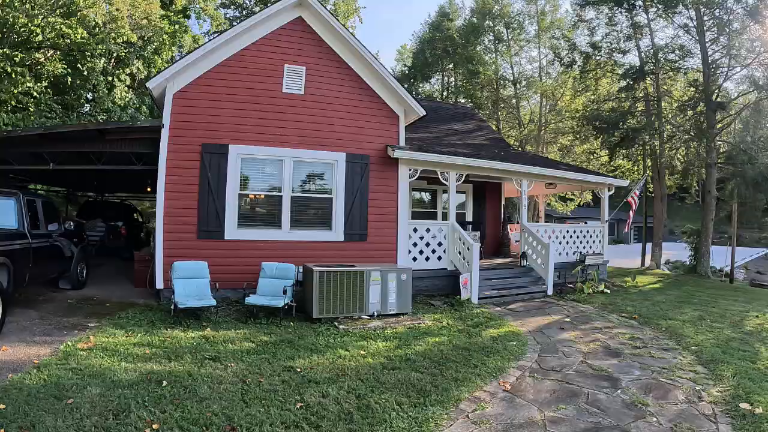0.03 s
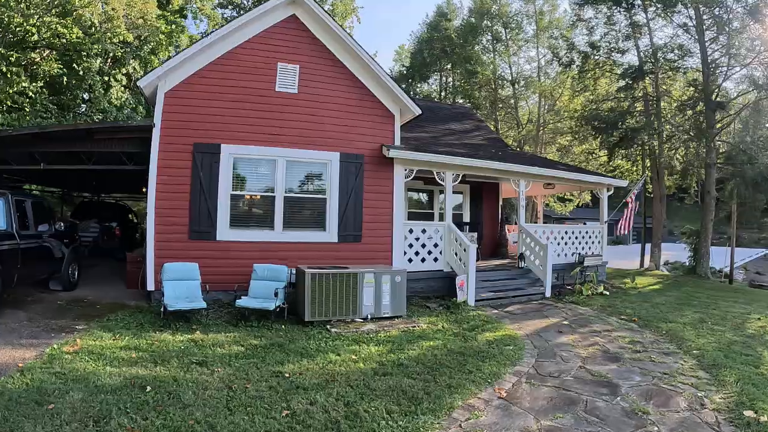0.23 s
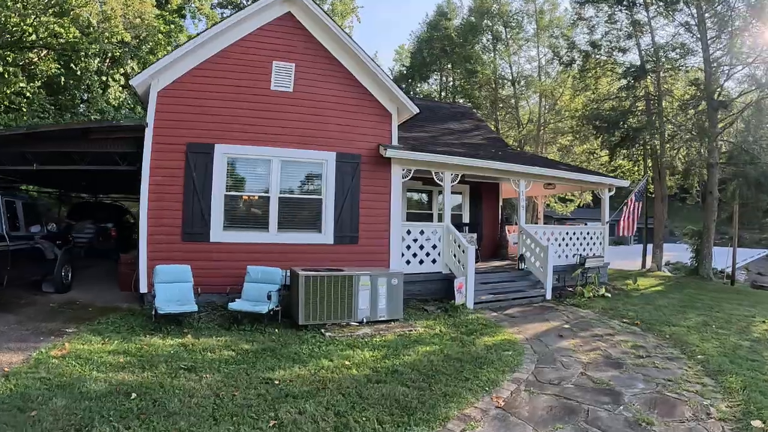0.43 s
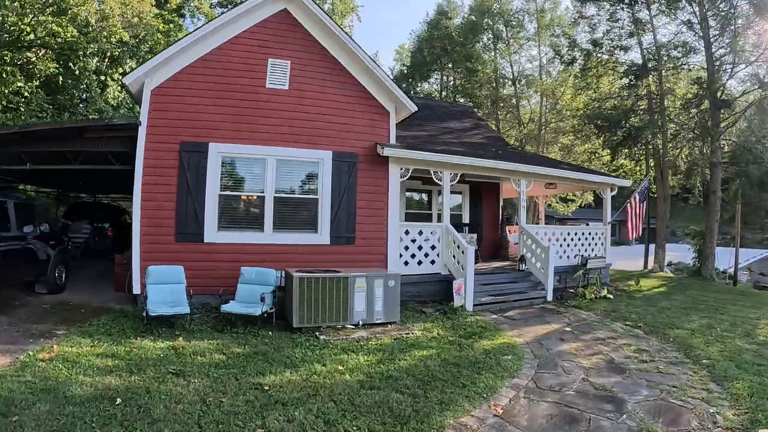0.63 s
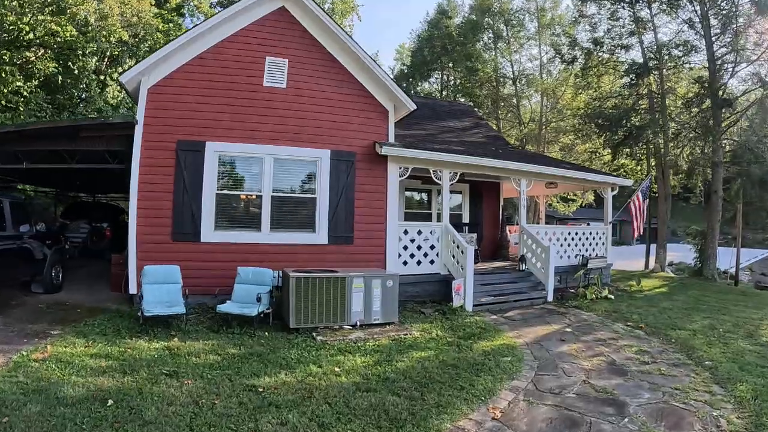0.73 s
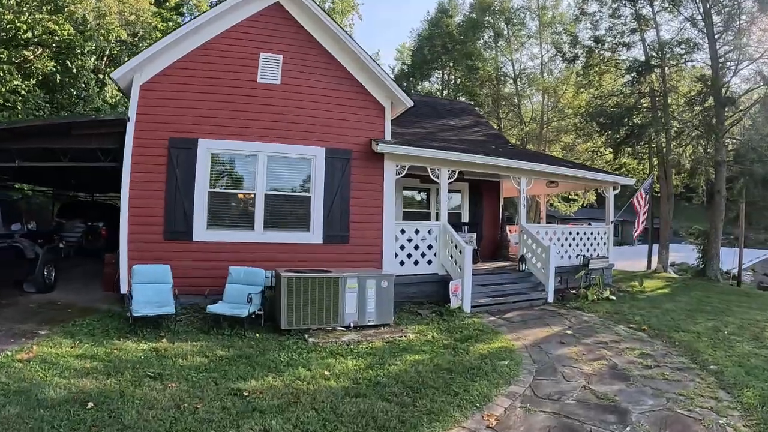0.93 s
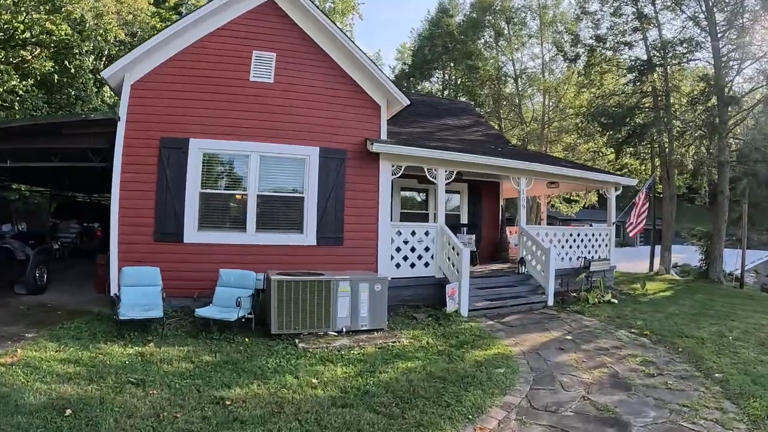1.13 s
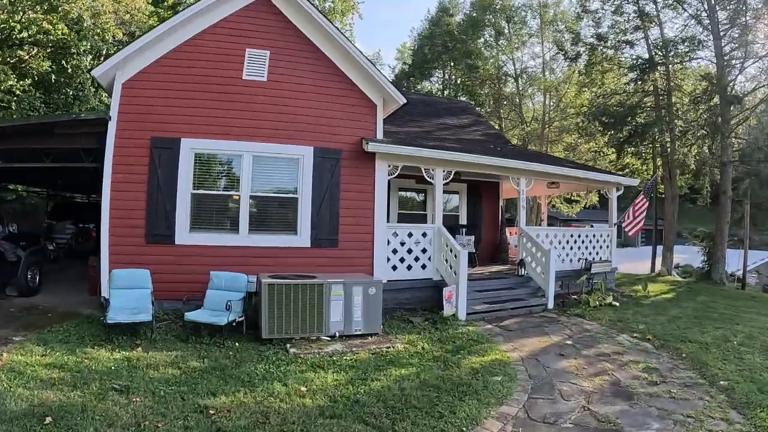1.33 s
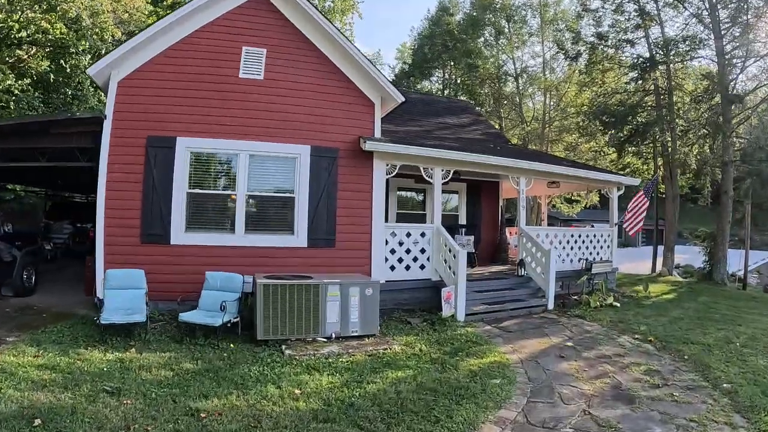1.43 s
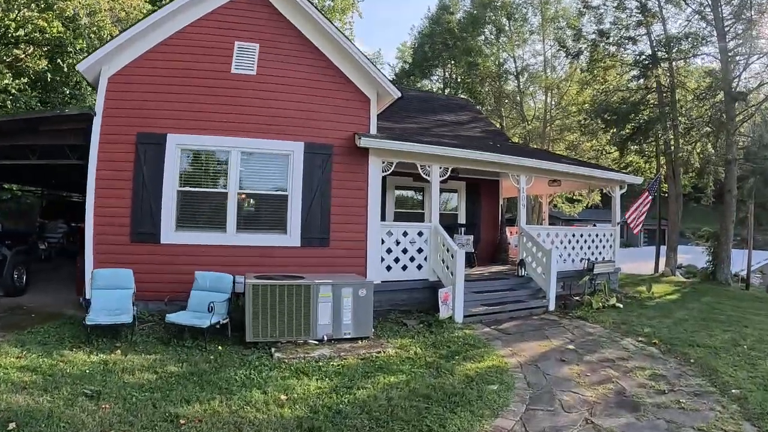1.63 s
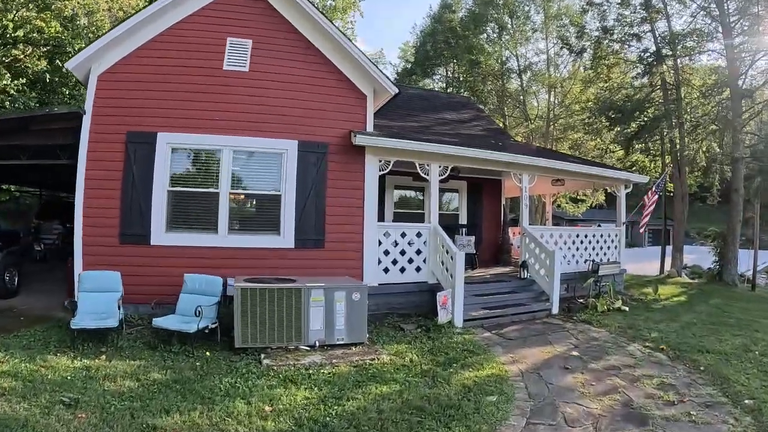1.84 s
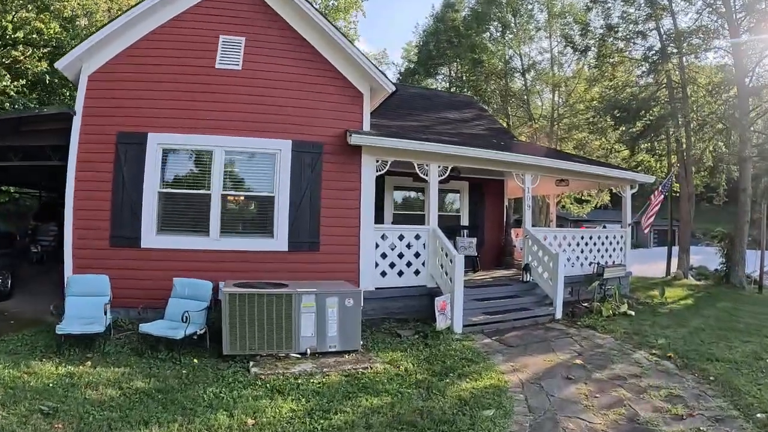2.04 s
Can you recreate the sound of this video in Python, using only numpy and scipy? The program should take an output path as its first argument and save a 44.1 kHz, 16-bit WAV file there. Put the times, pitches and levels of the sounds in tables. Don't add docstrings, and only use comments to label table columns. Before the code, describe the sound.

An outdoor air conditioner beside a house fades in from silence at about 0.1 to 0.3 s, then runs steadily to 2.1 s: low mains hum, cabinet rumble, soft fan rush. A vehicle passes nearby, tyre roar strongest around 0.5 to 0.8 s, low engine drone around 0.7 to 1 s, sagging slightly and fading. Low wind puffs flutter at the microphone, notably 0.8 and 1.5 s; leaves and insects are barely audible.

```python
import sys
import numpy as np
from scipy import signal
from scipy.fft import rfft, irfft, next_fast_len
from scipy.io import wavfile
from scipy.ndimage import uniform_filter1d, map_coordinates

SR = 44100
rng = np.random.default_rng(int(sys.argv[2]) if len(sys.argv) > 2 else 0)


def attenuation_scalar(level_db):
    decades = np.asarray(level_db, float) / 20
    return 10 ** decades


def to_wav(sig):
    pcm = np.clip(np.atleast_2d(sig), -1, 1) * 32767
    pcm = np.round(pcm).astype(np.int16)
    wavfile.write(sys.argv[1], SR, pcm.T)


N = 91551
TIME_S = np.arange(N) / SR


def unit(x):
    return x / np.sqrt(np.mean(x ** 2) + 1e-20)


def curves(rows):
    knot_s, *columns = np.transpose(rows)
    return [np.interp(TIME_S, knot_s, column) for column in columns]


def wobble(rate):
    return map_coordinates(rng.standard_normal(200), [TIME_S * rate])


def coloured(x, spectrum):
    knot_hz, knot_db = np.transpose(spectrum)
    size = next_fast_len(N + 8192)
    hz = np.fft.rfftfreq(size, 1 / SR)
    gain_db = np.interp(np.log(hz + 1), np.log(knot_hz + 1), knot_db, left=-120, right=-120)
    return unit(irfft(rfft(x, size) * attenuation_scalar(gain_db), size)[:N])


def rush(spectrum, patchy_db):
    cells = signal.stft(rng.standard_normal(N), nperseg=512)[2]
    patches = uniform_filter1d(rng.standard_normal(cells.shape), size=6, axis=0)
    patches = unit(uniform_filter1d(patches, size=14, axis=1))
    noise = signal.istft(cells * attenuation_scalar(patchy_db * patches), nperseg=512)[1][:N]
    return coloured(noise, spectrum)


def tone(cycles, rough_db, drift, rate):
    phase = 2 * np.pi * (cycles + rng.random()) + drift * wobble(rate)
    level = np.sqrt(2) * attenuation_scalar(rough_db * wobble(rate))
    return level * np.sin(phase)


# pitch_hz, level_db
COMPRESSOR_HUM = [(60, -44), (120, -39), (180, -57.5), (240, -65), (360, -64)]
# start_s, level_db
FAN_LEVEL = [(0, -32.5), (.5, -31), (1, -35), (1.45, -35), (1.75, -34.5), (2.08, -33.5)]
# pitch_hz, level_db (per Hz)
CABINET_RUMBLE = [(5, -1), (25, -1.5), (60, -1), (105, 2), (170, -2), (250, -9.5), (330, -15), (460, -26)]
# pitch_hz, level_db (per Hz)
GRILLE_AIR = [(250, -14.5), (450, -1.5), (750, 1.5), (1600, -5.5), (2400, -15), (4000, -21.5), (6500, -36),
              (9000, -46.5)]


def conditioner():
    hum = sum(attenuation_scalar(level_db) * tone(pitch_hz * TIME_S, rough_db=2.5, drift=.2, rate=8.2)
              for pitch_hz, level_db in COMPRESSOR_HUM)
    rumble = attenuation_scalar(0.4 * wobble(7)) * rush(CABINET_RUMBLE, patchy_db=0.4)
    air_db = -8
    air = attenuation_scalar(air_db + 0.3 * wobble(7)) * rush(GRILLE_AIR, patchy_db=0.8)
    return hum + attenuation_scalar(curves(FAN_LEVEL)[0]) * (rumble + air)


# start_s, pitch_hz (cylinder firings a second), level_db
ENGINE_PASS = [(.1, 90.6, -38), (.25, 91.0, -36), (.4, 91.4, -30), (.58, 91.4, -31), (.72, 91.2, -27),
               (.98, 91.1, -27), (1.15, 90.6, -29), (1.25, 89.4, -35), (1.34, 88.8, -33), (1.45, 88.2, -39),
               (1.7, 87.5, -40), (1.85, 87.5, -48), (2.08, 88.0, -41)]
# multiple (of the firing pitch), level_db
ENGINE_TONES = [(.5, -19), (1, 0), (1.5, -22), (2, -15), (2.5, -22), (3, -21), (3.5, -25), (4, -27),
                (5, -33)]


def engine():
    upper_follows = .5
    rough_db, drift_rad = 3, .5
    firing_hz, level_db = curves(ENGINE_PASS)
    firings = np.cumsum(firing_hz) / SR
    loudest_db = level_db.max()
    upper_db = loudest_db + upper_follows * (level_db - loudest_db)
    note = np.zeros(N)
    for multiple, tone_db in ENGINE_TONES:
        main = multiple == 1
        swell_db = level_db if main else upper_db
        roughness = rough_db * (.4 if main else 1)
        sound = tone(multiple * firings, roughness, drift_rad * np.sqrt(multiple), rate=9)
        note += attenuation_scalar(tone_db + swell_db) * sound
    return note


# start_s, level_db
TYRE_LEVEL = [(0, -54), (.3, -47), (.5, -42.5), (.63, -46), (.78, -44), (.92, -52.5), (1.2, -50.5),
              (2.08, -55.5)]
# pitch_hz, level_db (per Hz)
TREAD_ROAR = [(110, -15.5), (170, -3.5), (450, -10), (1000, 6.5), (1500, 6), (2100, 0), (2400, -7.5),
              (6000, -27.5)]


def tyres():
    return attenuation_scalar(curves(TYRE_LEVEL)[0] + 0.2 * wobble(8)) * rush(TREAD_ROAR, patchy_db=0.7)


# peak_s, level_db, half_length_s, flutter_hz
WIND_GUSTS = [
    (.4, -39, .05, 18),
    (.55, -39, 0.054, 56),
    (0.808, -31, .05, 55),
    (1.03, -34.5, 0.058, 42),
    (1.313, -37, 0.046, 55),
    (1.53, -30, .06, 28),
    (1.803, -33.5, 0.039, 43),
    (1.845, -36.5, .08, 15),
]


def wind():
    gusts = np.zeros(N)
    for peak_s, level_db, half_s, flutter_hz in WIND_GUSTS:
        swell = np.exp(-((TIME_S - peak_s) / half_s) ** 2)
        gusts += attenuation_scalar(level_db) * swell * tone(flutter_hz * TIME_S, rough_db=2.5, drift=.9, rate=25)
    return gusts


# start_s, level_db
RUSTLE_LEVEL = [(0, -80), (.3, -71), (.9, -67.5), (1.3, -71.5), (2.08, -70)]
# pitch_hz, level_db (per Hz)
RUSTLE = [(4000, -5), (6500, -4), (8000, -2), (9500, -10), (11500, -23), (12500, -30.5), (14500, -33),
          (15300, -44.5)]
# start_s, level_db
FINE_RUSTLE_LEVEL = [(0, -101), (.9, -100), (1.05, -96.5), (1.33, -96), (1.4, -101), (1.7, -101),
                     (1.8, -97), (2.08, -96)]
# pitch_hz, level_db (per Hz)
FINE_RUSTLE = [(10500, -18), (12500, -8), (13500, -0.5), (14800, -1), (15300, -13.5)]


def leaves():
    rustle = attenuation_scalar(curves(RUSTLE_LEVEL)[0] + 0.56 * wobble(3.6)) * rush(RUSTLE, patchy_db=0.0)
    fine = attenuation_scalar(curves(FINE_RUSTLE_LEVEL)[0] + 1.5 * wobble(9)) * rush(FINE_RUSTLE, patchy_db=5)
    return rustle + fine


# peak_s, level_db
LEAF_TICKS = [
    (1.278, -82),
    (1.322, -85),
    (1.11, -88),
]
# pitch_hz, level_db (per Hz)
TICK_COLOUR = [(4000, -10), (8000, -6), (11500, -6), (13500, 0), (15500, -6)]


def ticks():
    level = sum(attenuation_scalar(level_db) * np.exp(-((TIME_S - peak_s) / .004) ** 2) for peak_s, level_db in LEAF_TICKS)
    return level * coloured(rng.standard_normal(N), TICK_COLOUR)


# pitch_hz, level_db
INSECT_SONG = [(4009, -83), (4133, -82)]


def insects():
    return sum(attenuation_scalar(level_db) * tone(pitch_hz * TIME_S, rough_db=3, drift=.6, rate=12)
               for pitch_hz, level_db in INSECT_SONG)


def scene():
    mix = conditioner() + engine() + tyres() + wind() + leaves() + ticks() + insects()
    return mix[None]


def low_pass(x):
    return signal.sosfilt(signal.butter(12, 15650, fs=SR, output="sos"), x)


def record(dry):
    fade_from_s, fade_s, fade_power = 0.098, 0.18, 1.51
    progress = np.clip((TIME_S - fade_from_s) / fade_s, 0, 1)
    fade = np.sin(np.pi / 2 * progress) ** fade_power
    return low_pass(dry * fade)


dry = scene()
out = record(dry)
to_wav(out)
```